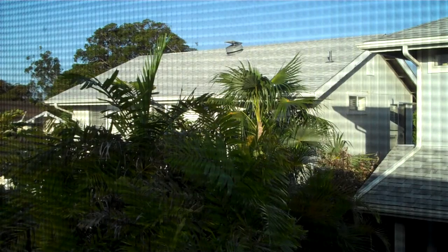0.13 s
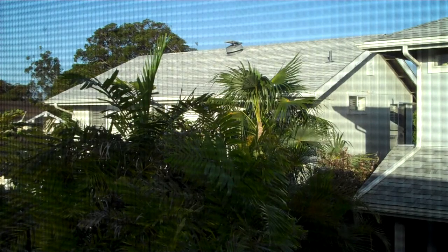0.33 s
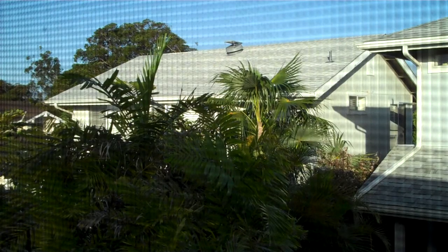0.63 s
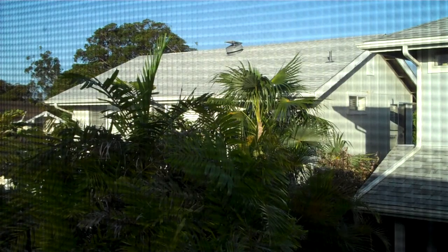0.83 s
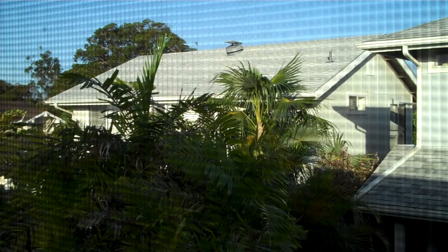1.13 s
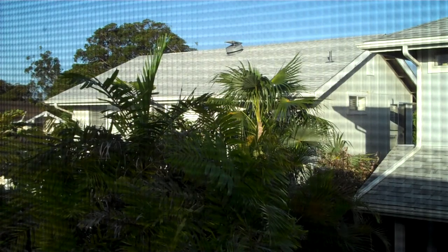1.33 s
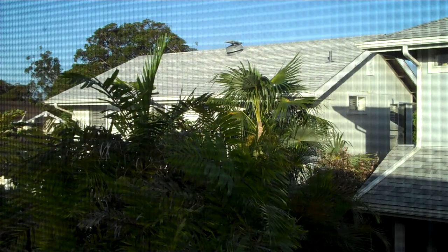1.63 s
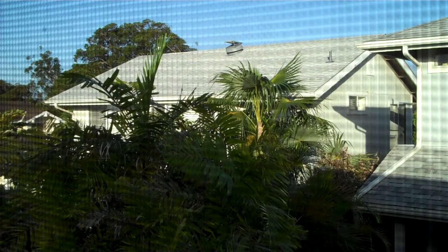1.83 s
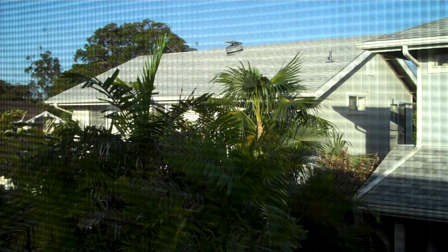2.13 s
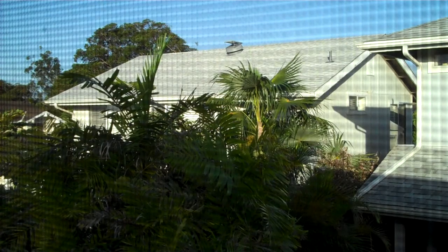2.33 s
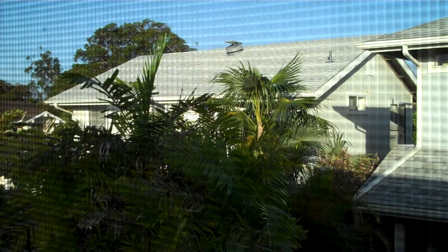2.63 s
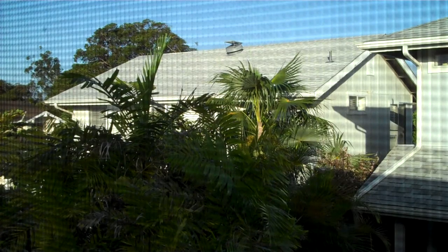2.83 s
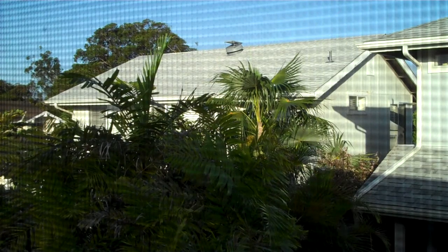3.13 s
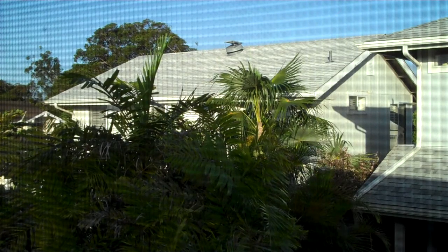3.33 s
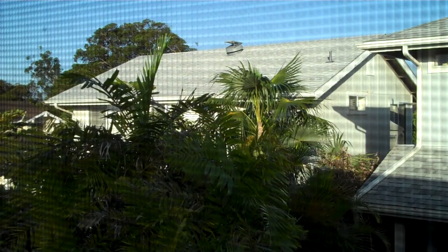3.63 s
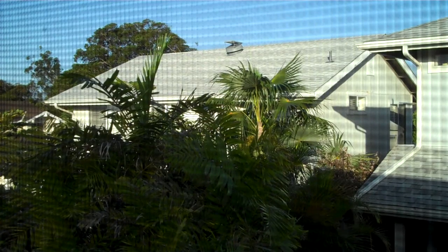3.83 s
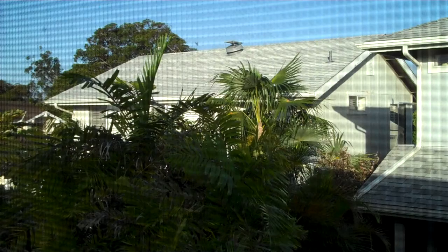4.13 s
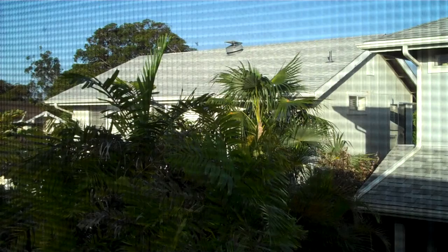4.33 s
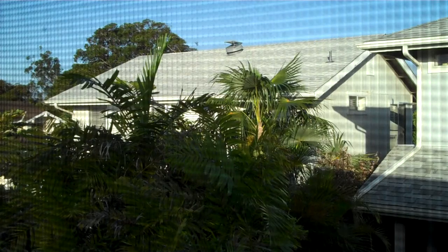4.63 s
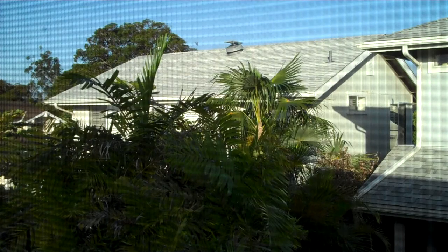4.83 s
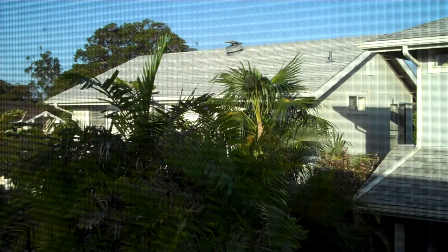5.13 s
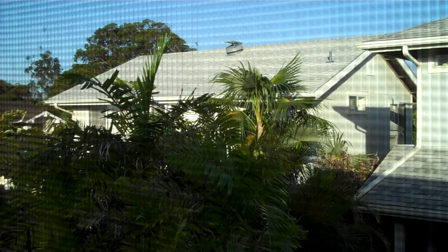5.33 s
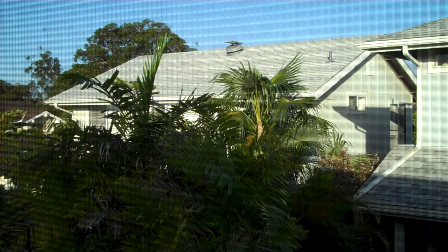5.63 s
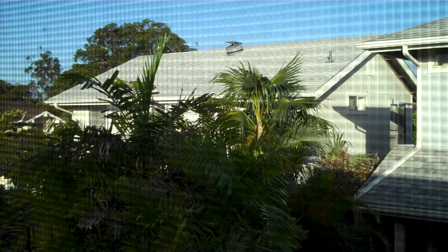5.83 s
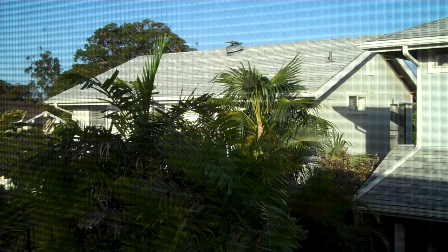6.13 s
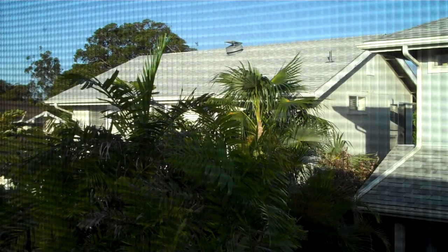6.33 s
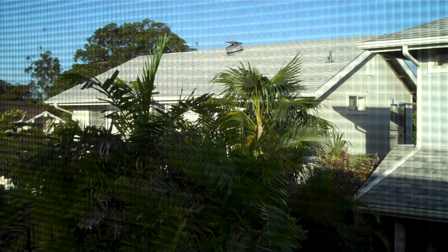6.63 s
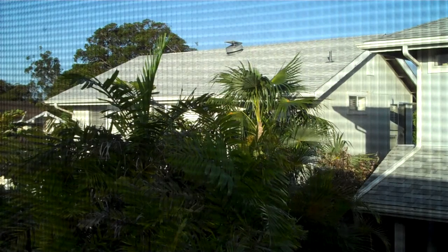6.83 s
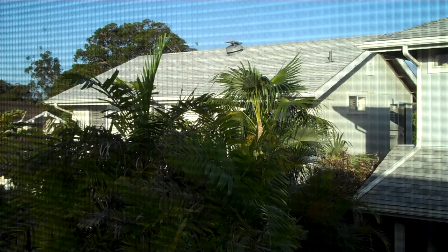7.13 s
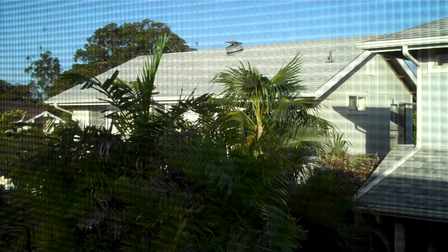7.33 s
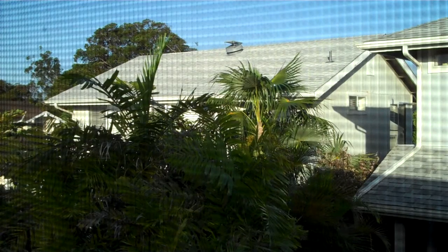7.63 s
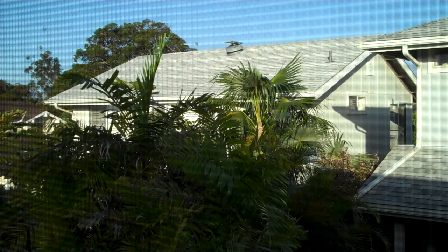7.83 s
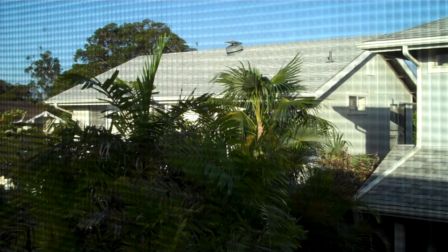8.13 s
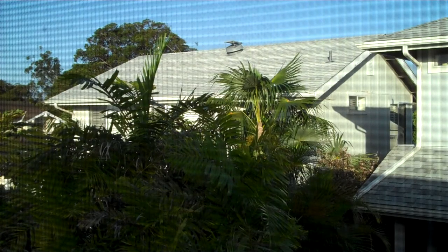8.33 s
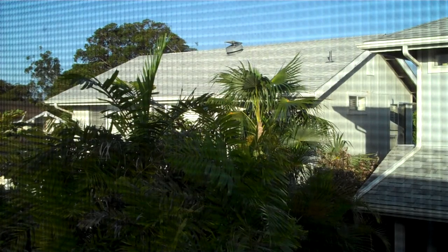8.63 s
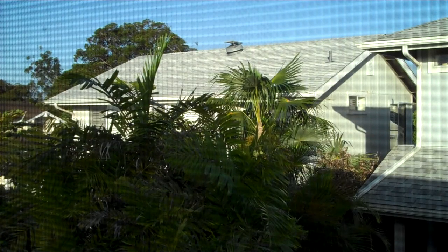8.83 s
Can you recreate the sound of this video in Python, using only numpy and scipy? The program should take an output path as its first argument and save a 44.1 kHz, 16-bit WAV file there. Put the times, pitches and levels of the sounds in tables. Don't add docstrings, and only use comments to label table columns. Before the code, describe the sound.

Fixed stereo microphone overlooking roofs and palms. Very quiet background of far traffic-like hum, a faint machine drone and insects hissing. Small birds chirp and cheep sparsely, with blurred distant whistles. A short trilled churr leads into a single sudden, harsh parrot screech around 3.7 seconds, far louder than everything else, its echo fading off walls in under a second. Afterwards the calm returns, with more frequent small chirps toward the end.

```python
import sys
import numpy as np
from scipy import signal
from scipy.fft import rfft, irfft
from scipy.io import wavfile
from scipy.ndimage import uniform_filter1d

SR = 44100
rng = np.random.default_rng(int(sys.argv[2]) if len(sys.argv) > 2 else 0)


def voltage_ratio(decibels):
    exponent = np.asarray(decibels, float) / 20
    return 10 ** exponent


def waveform_to_disk(signal):
    frames = np.transpose(np.atleast_2d(signal))
    scaled = np.clip(frames, -1, 1) * 32767
    samples = np.round(scaled).astype(np.int16)
    wavfile.write(sys.argv[1], SR, samples)


N = 395577


def evened(x):
    return x / np.sqrt(np.mean(abs(x) ** 2) + 1e-20)


def read(points, hz):
    f, value = np.transpose(points)
    return np.interp(np.log(hz + 1), np.log(f + 1), value)


def add(mix, start_s, sound):
    part = mix[round(start_s * SR):][:len(sound)]
    part += sound[:len(part)]


def wobble(size, hz):
    a, b = rng.standard_normal((size + 2000, 2)).T
    r = np.exp(-2 * np.pi * hz / SR)
    smooth = signal.lfilter([1], np.convolve([1, -r], [1, -r]), a + 1j * b)
    return evened(smooth[2000:])


def placed(x, lean_db, lag):
    return np.array([np.roll(x, lag) * voltage_ratio(lean_db / 2), x * voltage_ratio(-lean_db / 2)])


def mains():
    carrier = np.exp(2j * np.pi * 120 * np.arange(N) / SR)
    return voltage_ratio(-71.5) * (wobble(N, 10.3) * carrier).real


# (frequency [Hz], likeness [0-1])
LIKENESS = [(30, .2), (120, 0.62), (460, 0.741), (910, 0.99), (1800, 0.12), (3500, 0.328), (7000, 0.12),
            (14000, 0.285)]
# (frequency [Hz], level [dB])
LEAN_DB = [(60, -2.5), (230, 2.5), (910, 1), (1800, 4.5), (3500, 2), (6600, -0.5), (7500, 7.5), (9000, 4.5),
           (14000, 3)]
LEFT_LAG_SAMPLES = 6


def wash(shape, level, band_hz, patchy_db, flicker_db):
    frames, hz = N // 256 + 5, np.fft.rfftfreq(1024, 1 / SR)
    a, b, c, d, patches = rng.standard_normal((frames, 513, 5)).T
    patches = uniform_filter1d(patches, size=12, axis=0)
    patches = evened(uniform_filter1d(patches, size=14, axis=1))
    flicker = evened(uniform_filter1d(rng.standard_normal(frames), size=6))

    same = np.clip(read(LIKENESS, hz), 0, 1)[:, None]
    late = np.exp(-2j * np.pi * hz * LEFT_LAG_SAMPLES / SR)[:, None]
    right = a + 1j * b
    left = same * late * right + np.sqrt(1 - same ** 2) * (c + 1j * d)
    lean_db = read(LEAN_DB, hz)[:, None] / 2
    colour_db = np.array([lean_db, -lean_db]) + read(shape, hz)[:, None]
    z = np.array([left, right]) * voltage_ratio(colour_db + patchy_db * patches + flicker_db * flicker)

    inside = (hz > band_hz[0]) & (hz < band_hz[1])
    share = np.sum(abs(z[:, inside]) ** 2) / np.sum(abs(z) ** 2)
    x = signal.istft(z, nperseg=1024, noverlap=768)[1][:, :N]
    x = evened(x) / np.sqrt(share)
    return x * voltage_ratio(np.interp(np.arange(N) / SR, *np.transpose(level)))


# (frequency [Hz], density [dB per Hz])
HUM_SHAPE = [(15, -44), (25, -20.5), (49, -8.5), (120, -8), (273, -8.5), (417, -4), (690, -6.5), (1080, -7),
             (1500, -11.5), (3500, -11), (4500, -19), (7300, -16), (10000, -21), (14200, -24)]
# (time [s], level [dB])
HUM_LEVEL = [(0, -60.5), (1.2, -62), (2.3, -62), (3.5, -61), (4.7, -62), (6, -62.5), (7.3, -61.5),
             (8.97, -63)]


def suburb():
    return wash(HUM_SHAPE, HUM_LEVEL, (250, 1300), patchy_db=.7, flicker_db=.15)


# (frequency [Hz], density [dB per Hz])
CHORUS_SHAPE = [(1500, -26.5), (3000, -12.5), (5000, -8.5), (6300, -5), (7200, -1), (7900, -5),
                (8600, -11.5), (11000, -17.5), (14500, -20.5)]
# (time [s], level [dB])
CHORUS_LEVEL = [(0, -63.5), (0.15, -57), (0.55, -59), (.97, -58), (2.02, -59), (2.62, -56), (3.02, -58.5),
                (3.6, -56.5), (4.5, -59), (6.85, -59.5), (7.59, -56), (7.99, -58.5), (8.57, -58),
                (8.97, -59.5)]
HUSH_FROM_S, HUSH_TO_S, HUSH_EDGE_S, HUSH_DB = 1.34, 1.85, 0.052, -28


def insects():
    t = np.arange(0, N / SR + .01, .005)
    hush = np.clip(np.minimum(t - HUSH_FROM_S, HUSH_TO_S - t) / HUSH_EDGE_S, 0, 1)
    level_db = np.interp(t, *np.transpose(CHORUS_LEVEL)) + HUSH_DB * hush
    level = np.transpose([t, level_db])
    return wash(CHORUS_SHAPE, level, (6000, 8500), patchy_db=1.29, flicker_db=-0.03)


HOOK, RISE, FALL, LEVEL, CHEEP = (.9, 0.67), (.9, 1.07), (1.07, 0.895), (0.9785, 0.966), (.9, .93)
CREST = (.83, .93)


def calls(rows, shape, rough, smear_hz, edge, buzz=0, buzz_hz=250, trill=0, trill_hz=80):
    out = np.zeros(N)
    for start_s, length_s, middle_hz, db, *glide in rows:
        u = np.linspace(0, 1, round(length_s * SR))
        arc = np.polyval(np.polyfit([0, .5, 1], [shape[0], 1, shape[1]], 2), u)
        hz = middle_hz * (arc + sum(glide) * (u - .5))
        hz = hz * (1 + trill * np.sin(2 * np.pi * trill_hz * u * length_s))
        folds = np.sqrt(1 - min(rough, 1) ** 2) + rough * wobble(len(u), smear_hz)
        pulses = np.exp(buzz * np.cos(2 * np.pi * buzz_hz * np.cumsum(hz / hz.mean()) / SR))
        carrier = np.exp(2j * np.pi * np.cumsum(hz) / SR)
        tone = evened((folds * pulses * carrier).real)
        fade = signal.windows.tukey(len(u), np.clip(edge, 0, 1))
        add(out, max(start_s, 0), voltage_ratio(db) * tone * fade)
    return out


# (time [s], length [s], middle pitch [Hz], level [dB])
WHISTLES = [(.44, 0.085, 2810, -68.5), (.51, 0.088, 3170, -67), (.6, 0.039, 2880, -68.5),
            (.62, 0.0358, 2425, -65), (.69, 0.09, 3387, -66.5), (2.27, 0.132, 1804, -70.5),
            (2.4, 0.103, 3546, -69), (2.49, 0.098, 2237, -71.5), (2.8, 0.131, 3022, -68),
            (2.86, 0.037, 3470, -65), (3.2, .125, 3020, -63.5), (4.65, 0.053, 3007, -69),
            (4.69, .065, 2554, -66), (6.25, 0.106, 2753, -75), (6.32, 0.184, 3180, -68),
            (6.41, 0.133, 2490, -69), (6.59, 0.0966, 2540, -71.5), (6.85, 0.362, 1959, -69)]
# (time [s], length [s], middle pitch [Hz], level [dB], glide [share of pitch])
WHINES = [
    (0.001, .65, 1038, -67.5, -.031),
    (1.785, .17, 2145, -68, .095),
    (1.905, .33, 5200, -67.5, .004),
    (2.21, .98, 5415, -69, .034),
    (2.46, .48, 5225, -73.5, -.012),
    (3.577, .048, 4840, -65.5, .088),
    (5.16, 1.19, 1130, -72, -.155),
    (6.56, .84, 1088, -72, -.078),
    (7.3, 1.0, 1135, -72, .14),
]


def far_whistles():
    return calls(WHISTLES, LEVEL, .9, 80, .4) + calls(WHINES, LEVEL, .85, 45, .4)


# (time [s], length [s], middle pitch [Hz], level [dB])
HOOKS = [(1.605, .033, 3800, -67), (1.755, 0.047, 3977, -63.5), (7.745, 0.0255, 3900, -61),
         (7.845, 0.0358, 3773, -61.5), (8.13, 0.02, 3747, -63.5), (8.345, .039, 3800, -61.5),
         (8.675, 0.033, 3990, -63), (8.71, 0.0262, 4000, -61), (8.925, 0.0406, 3877, -64.5)]
RISES = [(.675, 0.0197, 3103, -63), (.885, .032, 4380, -62), (2.945, 0.038, 3922, -60.5),
         (4.59, 0.03, 3900, -62), (7.775, 0.0263, 3980, -61.5), (8.745, 0.0252, 2046, -64)]
FALLS = [(1.232, 0.038, 3740, -65), (1.36, .03, 3450, -74), (1.545, 0.0257, 4410, -68),
         (2.13, 0.0303, 3450, -65.5), (2.375, .04, 3725, -65.5), (8.1, 0.0284, 3580, -68.5),
         (8.79, 0.0174, 3697, -65)]
PIPS = [(.93, 0.031, 4800, -67), (1.275, 0.031, 3430, -65), (2.16, 0.028, 4000, -61),
        (7.23, 0.057, 3950, -64), (8.26, 0.0191, 2850, -65), (8.385, 0.0278, 3900, -61.5),
        (8.595, .039, 3420, -63), (8.78, 0.027, 2245, -66), (8.87, 0.0215, 3492, -64.5)]
CRESTS = [(1.498, .048, 4190, -64.2), (3.083, .046, 3600, -64.6), (7.112, .031, 4250, -66),
          (7.987, .041, 4220, -61), (8.552, .026, 4740, -66.6)]


def sparrows():
    songs = (HOOKS, HOOK), (RISES, RISE), (FALLS, FALL), (PIPS, LEVEL), (CRESTS, CREST)
    return sum(calls(rows, shape, .5, 150, .3) for rows, shape in songs)


# (time [s], length [s], middle pitch [Hz], level [dB])
CHEEPS = [
    (1.27, 0.053, 6930, -56.5),
    (1.29, 0.038, 5430, -53.5),
    (1.97, 0.0516, 4900, -57),
    (4.6, 0.0688, 4968, -56.5),
    (5.545, 0.047, 5127, -53.5),
    (6.43, 0.0677, 4904, -54.5),
    (7.42, 0.0567, 4519, -57),
    (8.36, 0.054, 4790, -59),
]


def scolding_bird():
    return calls(CHEEPS, CHEEP, 0.86, 560, 0.47)


# (time [s], length [s], middle pitch [Hz], level [dB], glide [share of pitch])
RASPS = [
    (3.32, .06, 1720, -68.5, .29),
    (3.398, .08, 1567, -63, .16),
    (6.79, 0.12, 2566, -61, -.2),
    (6.9, 0.152, 2727, -57.5, .12),
    (7.35, 0.25, 3300, -66, -0.096),
    (8.41, 0.1003, 2560, -62.5, -.08),
    (8.63, 0.076, 2105, -63, 0.11),
]
CHURRS = [
    (2.645, 0.0615, 2130, -56.5, -.3),
    (3.405, 0.068, 2493, -60.5, -.12),
    (3.503, .085, 2284, -52.5, -.14),
]


def mutters():
    rasps = calls(RASPS, LEVEL, 0.76, 200, 0.35, buzz=1.7, buzz_hz=253.13)
    return rasps + calls(CHURRS, LEVEL, .6, 150, .3, buzz=.7, buzz_hz=253.3, trill=.19, trill_hz=80)


# (time [s], length [s], middle pitch [Hz], level [dB], glide [share of pitch])
GULP = [
    (3.995, .06, 406, -55.5, -0.282),
]


def gulp():
    return calls(GULP, LEVEL, 0.8765, 52, 0.712)


# (time [s], effort [dB], pitch [Hz], beak resonance [Hz])
SQUAWK = [
    (3.632, -61.5, 368.5, 2712),
    (3.652, -35.5, 404, 2816),
    (3.69, -22, 445, 2800),
    (3.745, -17, 502.6, 1896),
    (3.81, -15, 541.1, 1950),
    (3.985, -16, 532.8, 3150),
    (4.0, -17, 494.2, 2000),
    (4.03, -27.5, 482.6, 1930),
    (4.075, -69.5, 476.7, 1900),
]
# (frequency [Hz], level [dB])
THROAT = [(180, -59), (400, -35.5), (560, -28), (1070, -4.5), (1600, -5.5), (2140, -0.5), (2380, -13),
          (2700, -4), (4300, -10.5), (4900, -21), (6600, -20.5), (7050, -15), (7700, -27), (13000, -62.5)]
TAUT_HZ = 542
ROUGH_TAUT, ROUGH_PER_SLACK = .19, 2.6
BRIGHT_TAUT_DB, DULL_PER_SLACK_DB = 0.817, 19.5
CRACK_AT_S, CRACK_S, CRACK_ROUGH = 4.002, .011, .35


def squawk():
    s, *columns = np.transpose(SQUAWK)
    t = np.arange(s[0], s[-1], 1 / SR)
    effort_db, hz, beak_hz = (np.interp(t, s, c) for c in columns)
    slack = np.maximum(1 - hz / TAUT_HZ, 0)
    crack = CRACK_ROUGH * np.exp(-((t - CRACK_AT_S) / CRACK_S) ** 2)
    rough = ROUGH_TAUT + ROUGH_PER_SLACK * slack + crack
    bright_db = BRIGHT_TAUT_DB - DULL_PER_SLACK_DB * slack
    turns = np.cumsum(hz * (1 + 0.00791 * wobble(len(t), 38.3).real)) / SR
    limp = 1 + 0.22 * np.exp(2j * np.pi * turns / 3) * wobble(len(t), 25.35)

    voice = np.zeros(len(t))
    for k in range(1, 26):
        flutter = 1 + .45 * wobble(len(t), 45)
        smear = np.clip(rough * (.25 + .32 * k + 1.6 * (k == 1)), 0, .8)
        folds = np.sqrt(1 - smear ** 2) * flutter * limp + smear * wobble(len(t), 280)
        beak_db = 4.9 * np.exp(-((k * hz - beak_hz) / 350) ** 2)
        lift_db = bright_db * np.log2(k / 4) + beak_db
        carrier = np.exp(2j * np.pi * (k * turns + rng.random()))
        voice += voltage_ratio(lift_db) * (folds * carrier).real
    voice *= 1 + 0.213 * wobble(len(t), 150).real

    throat = voltage_ratio(read(THROAT, np.fft.rfftfreq(len(t), 1 / SR)))
    voice = irfft(rfft(voice) * throat, len(t))
    voice /= np.sqrt(uniform_filter1d(voice ** 2, size=1500, mode="reflect"))
    out = np.zeros(N)
    add(out, s[0], voltage_ratio(effort_db) * voice * signal.windows.tukey(len(t), .03))
    return out


# (frequency [Hz], 60 dB decay time [s])
WALLS_T60 = [(400, .3), (1070, 0.893), (1600, 0.801), (2150, 0.745), (2700, 0.624), (3200, .65),
             (4300, 0.61), (8000, 0.658)]
# (delay [s], level [dB])
ECHOES = [
    (.011, -6.5),
    (0.021, -6),
    (.041, -9),
    (.067, -9.5),
    (0.094, -21),
]


def walls(x):
    taps = np.zeros((2, SR))
    at = np.arange(900, SR - 20, 20) + rng.integers(0, 20, (2, (SR - 901) // 20))
    np.put_along_axis(taps, at, rng.choice([-1., 1.], at.shape), 1)
    taps[1] = .75 * taps[0] + .66 * taps[1]
    hz, t, z = signal.stft(taps, SR, nperseg=256)
    decay_db = -60 * t / read(WALLS_T60, hz)[:, None]
    tail = signal.istft(z * voltage_ratio(decay_db), SR, nperseg=256)[1]
    tail *= voltage_ratio(-8.5) / np.linalg.norm(tail[0])
    for delay_s, db in ECHOES:
        tail[[0, 1], round(delay_s * SR) + rng.integers(0, 7, 2)] += voltage_ratio(db)
    return signal.fftconvolve(x[None], tail, axes=1)[:, :N]


def scene():
    background = placed(mains(), .1, lag=0) + suburb() + insects()
    hoarse = mutters() + far_whistles()
    chirps = sparrows() + scolding_bird()
    parrot = voltage_ratio(-2.5) * squawk() + gulp()
    near = placed(parrot, 1.6, lag=0) + placed(chirps, 3.26, lag=2) + placed(hoarse, .1, lag=-1)
    far = walls(parrot + voltage_ratio(-3.0) * chirps + voltage_ratio(-2.0) * hoarse)
    return background + near + far


def band_limit(x):
    return signal.sosfilt(signal.butter(12, 14390, fs=SR, output="sos"), x)


def record(dry):
    edge = signal.firwin(801, 14230, window=("kaiser", 9), fs=SR)
    mix = signal.oaconvolve(dry, edge[None], "same")
    return band_limit(mix)


dry = scene()
out = record(dry)
waveform_to_disk(out)
```